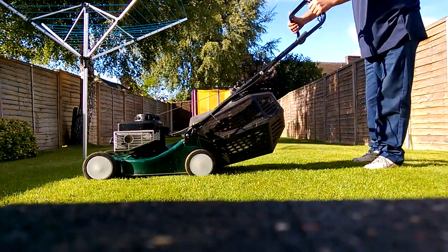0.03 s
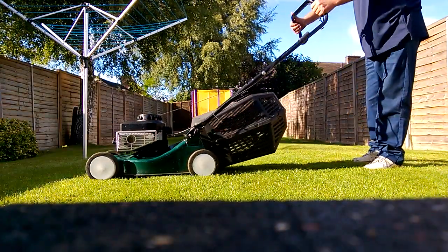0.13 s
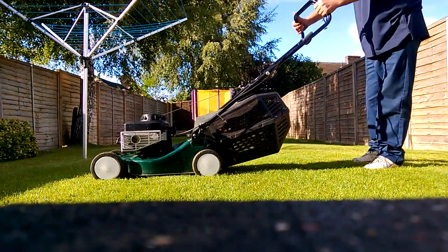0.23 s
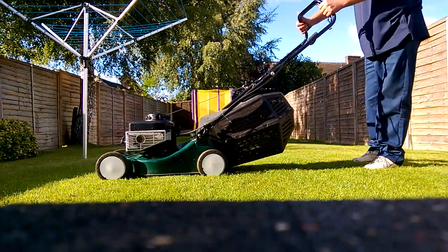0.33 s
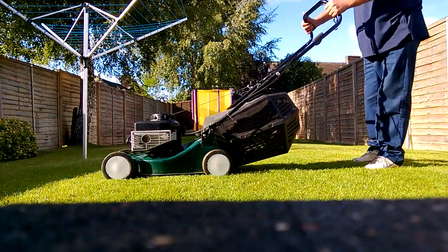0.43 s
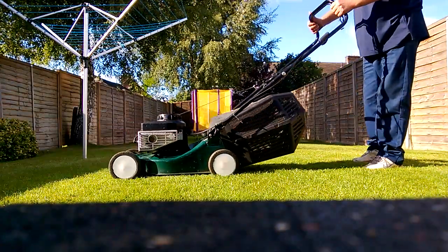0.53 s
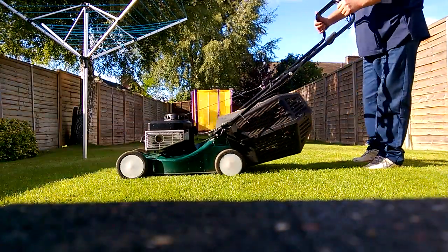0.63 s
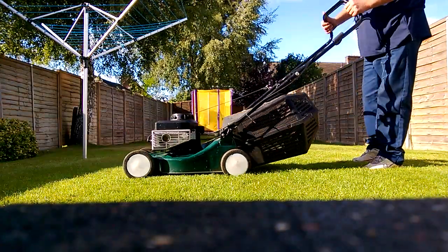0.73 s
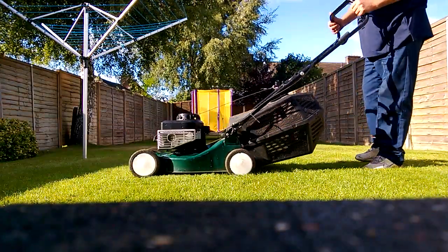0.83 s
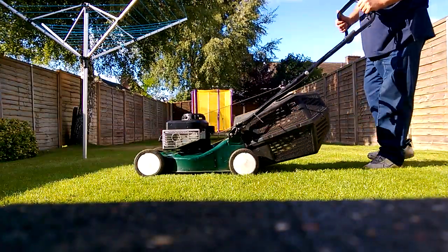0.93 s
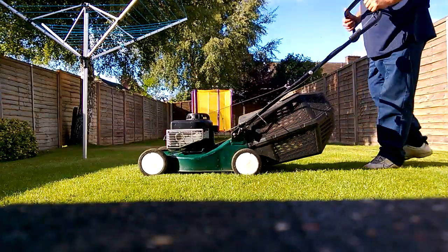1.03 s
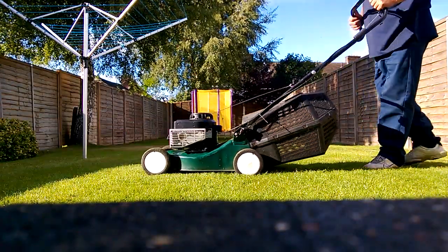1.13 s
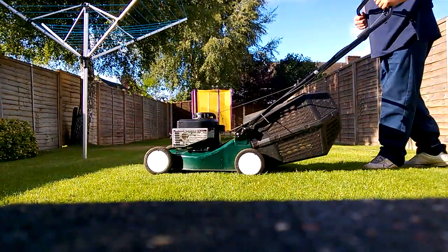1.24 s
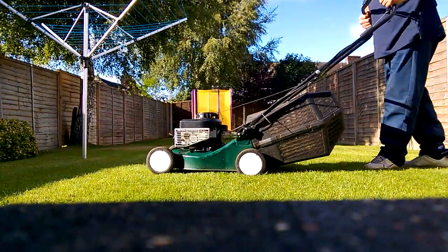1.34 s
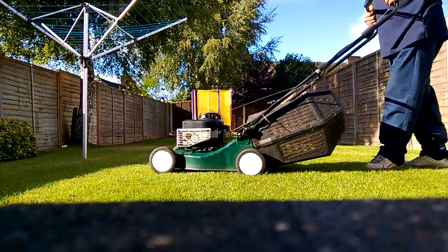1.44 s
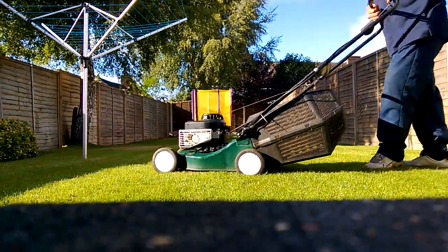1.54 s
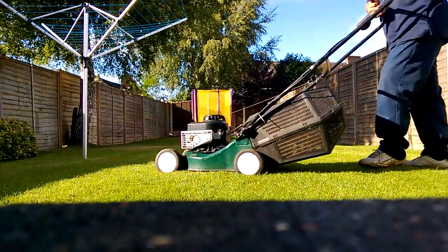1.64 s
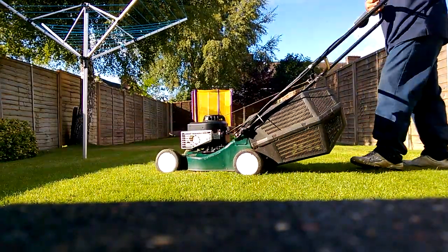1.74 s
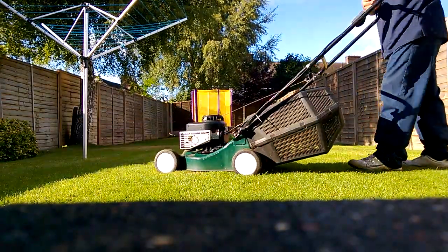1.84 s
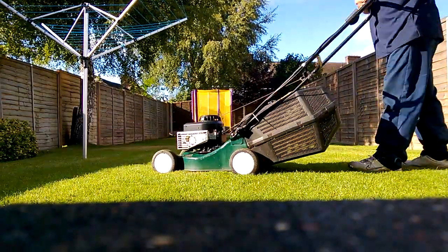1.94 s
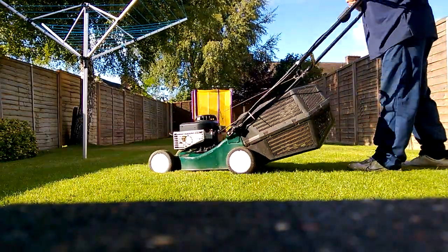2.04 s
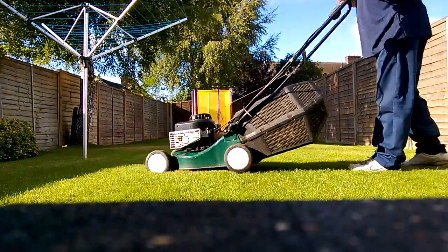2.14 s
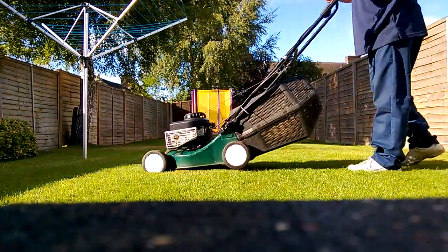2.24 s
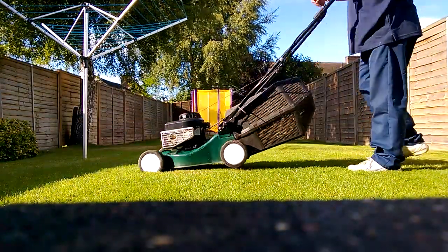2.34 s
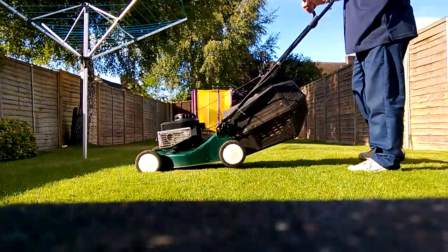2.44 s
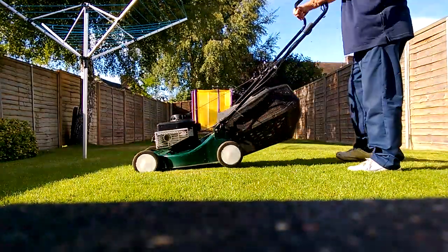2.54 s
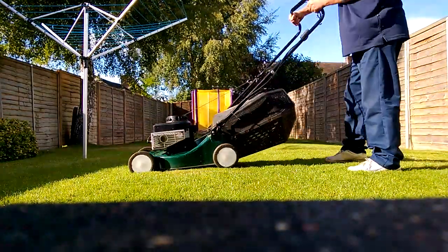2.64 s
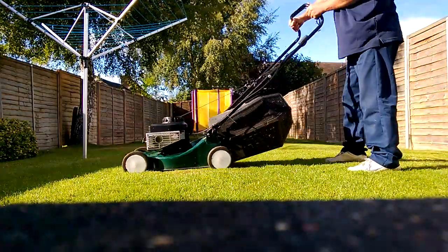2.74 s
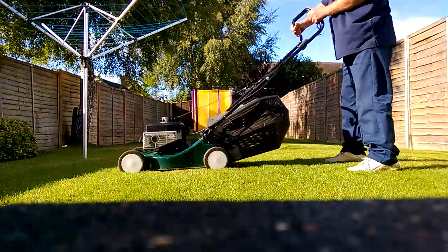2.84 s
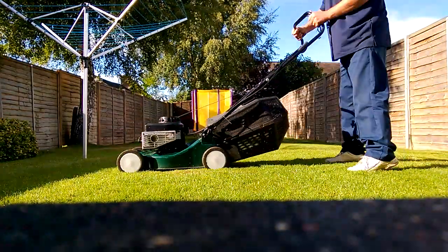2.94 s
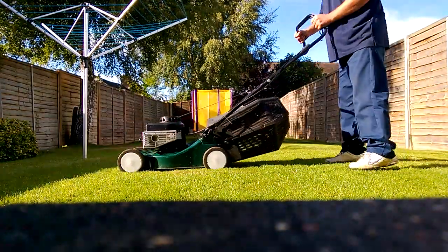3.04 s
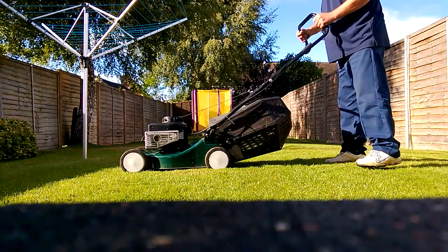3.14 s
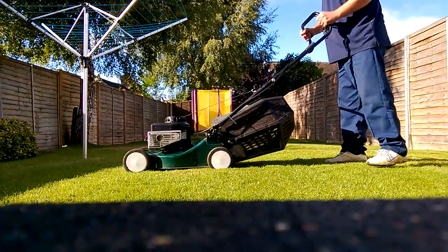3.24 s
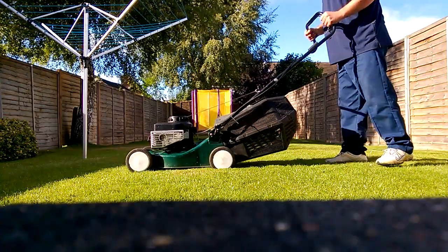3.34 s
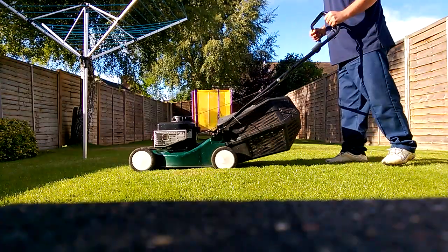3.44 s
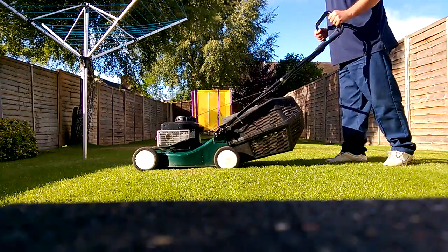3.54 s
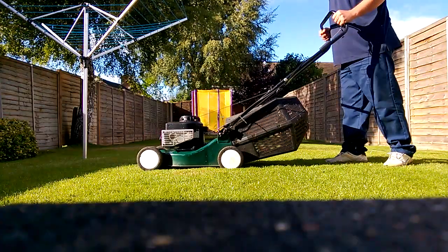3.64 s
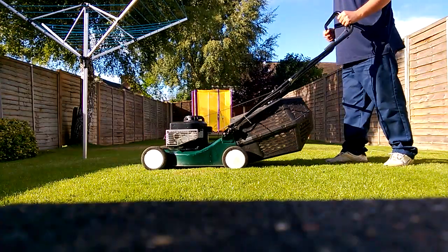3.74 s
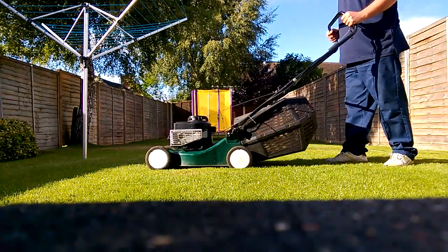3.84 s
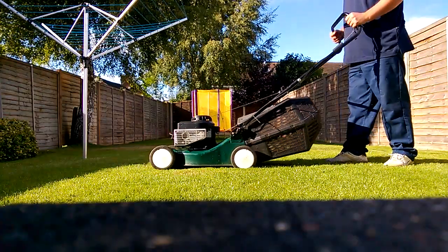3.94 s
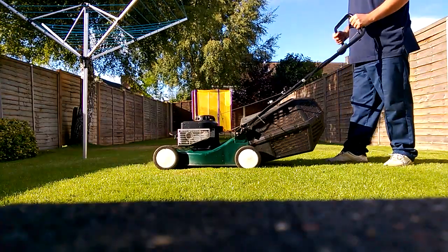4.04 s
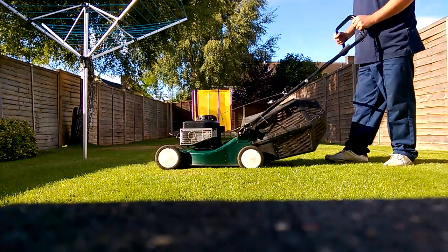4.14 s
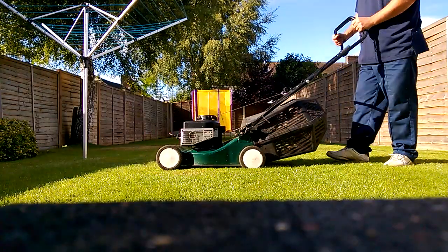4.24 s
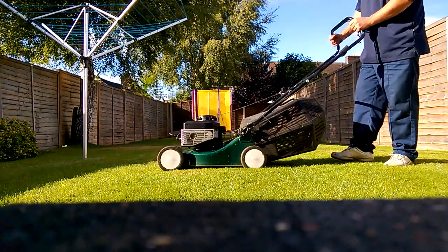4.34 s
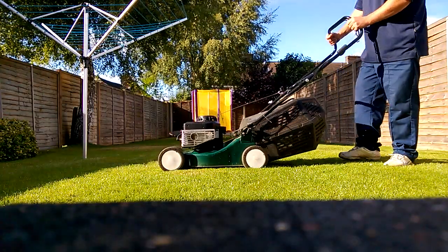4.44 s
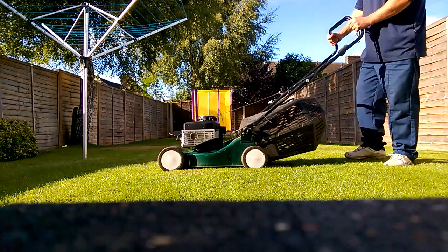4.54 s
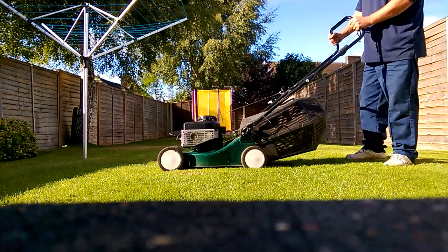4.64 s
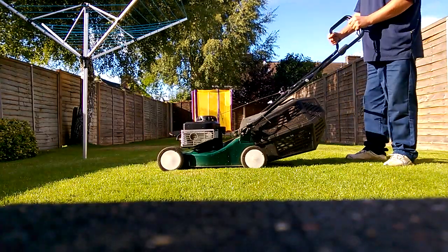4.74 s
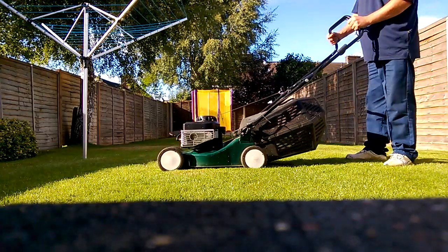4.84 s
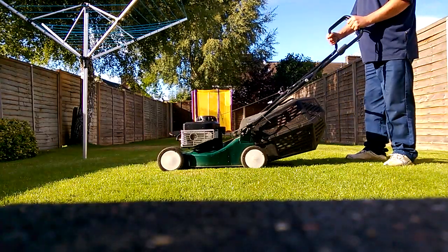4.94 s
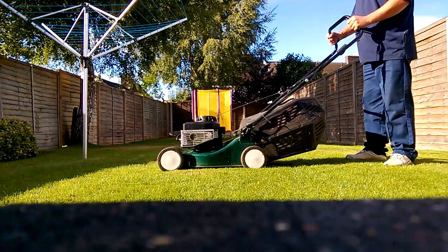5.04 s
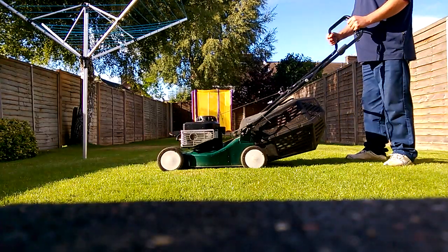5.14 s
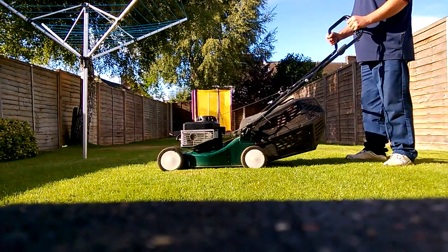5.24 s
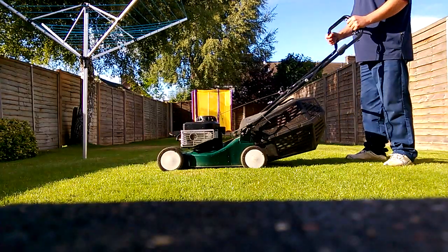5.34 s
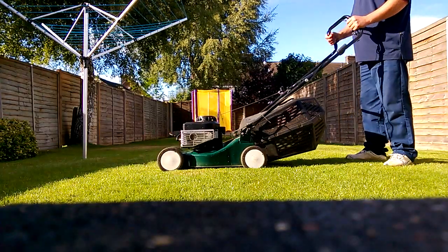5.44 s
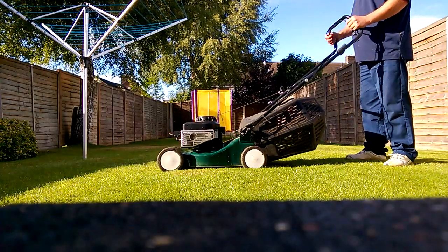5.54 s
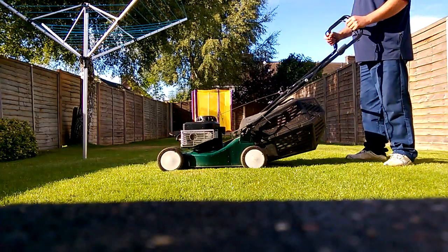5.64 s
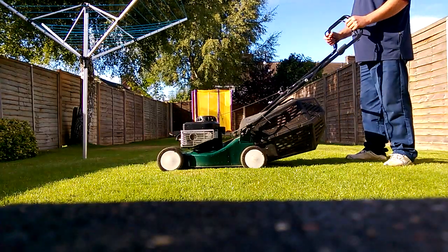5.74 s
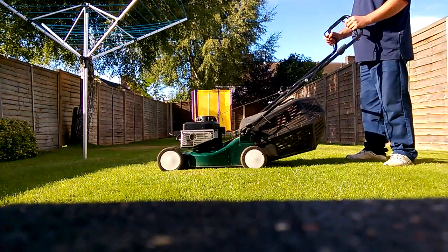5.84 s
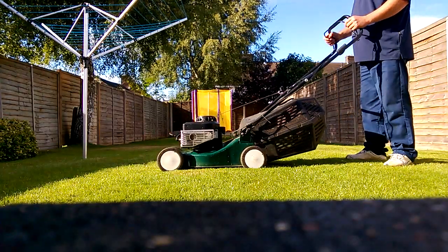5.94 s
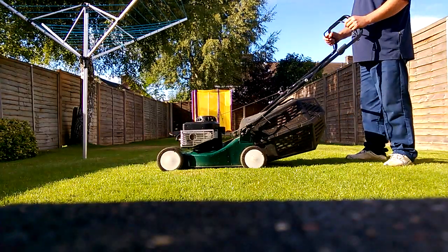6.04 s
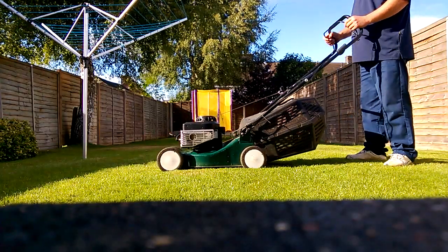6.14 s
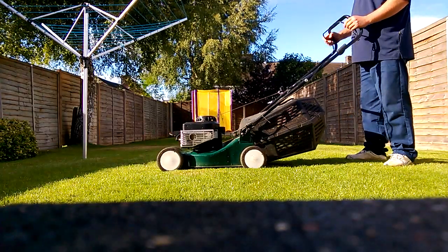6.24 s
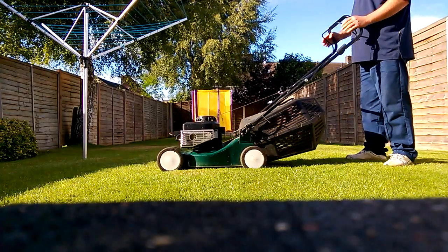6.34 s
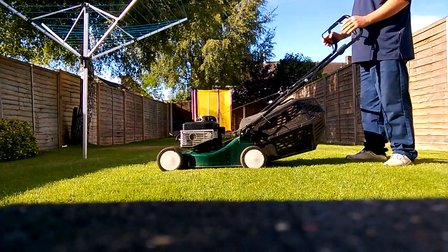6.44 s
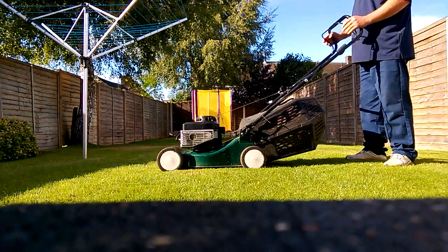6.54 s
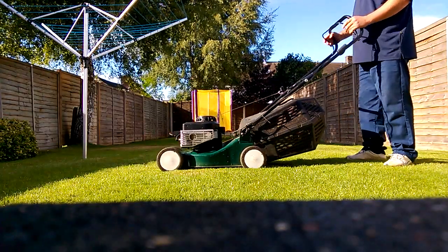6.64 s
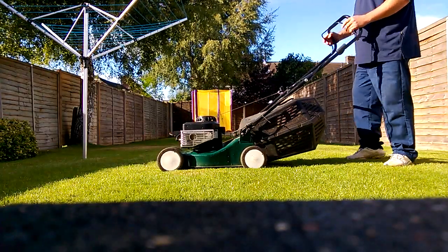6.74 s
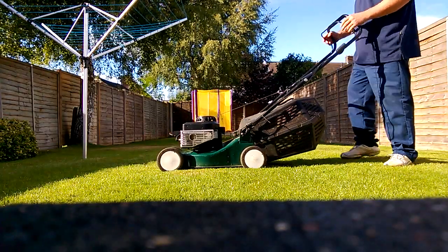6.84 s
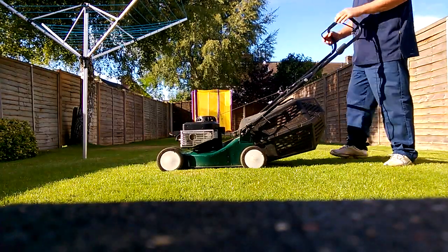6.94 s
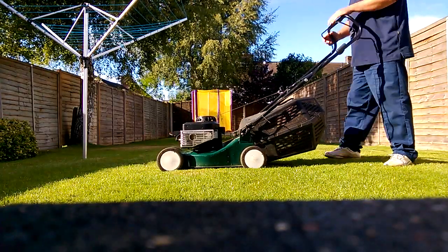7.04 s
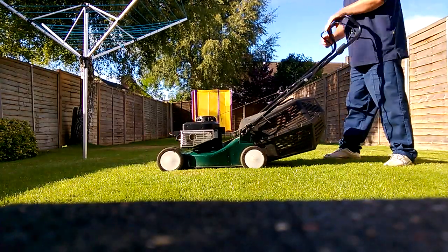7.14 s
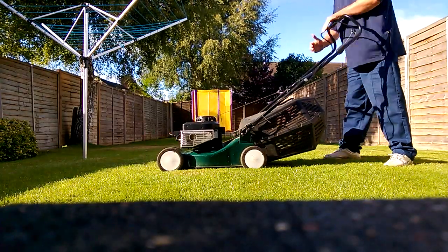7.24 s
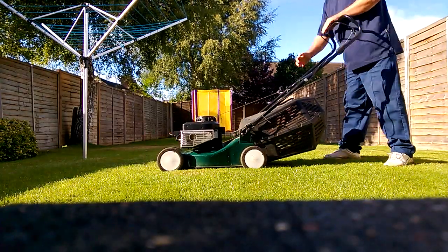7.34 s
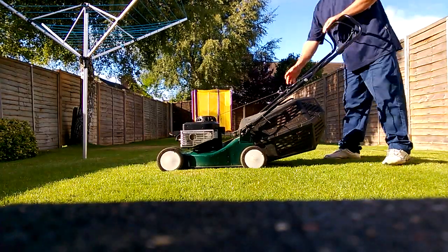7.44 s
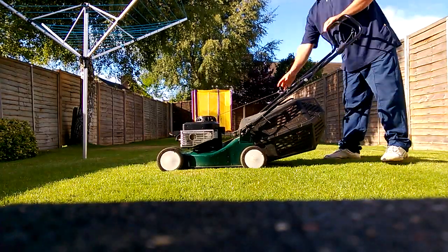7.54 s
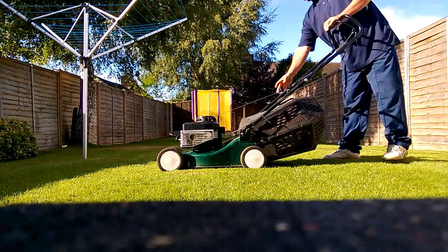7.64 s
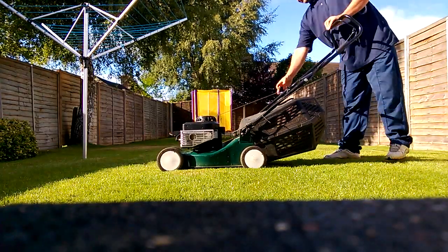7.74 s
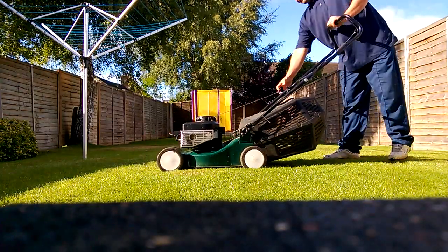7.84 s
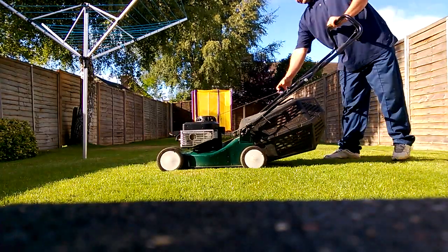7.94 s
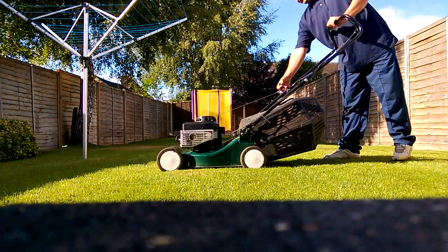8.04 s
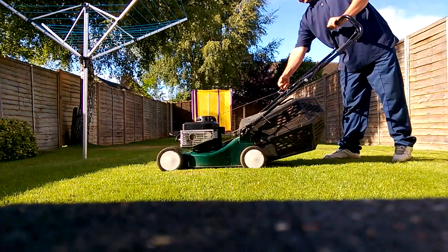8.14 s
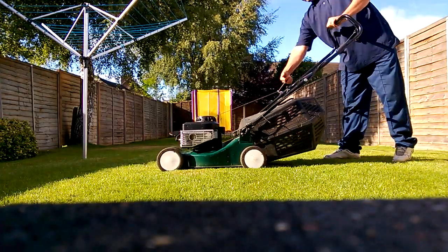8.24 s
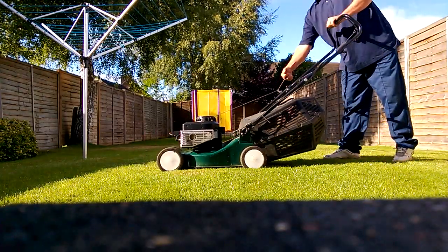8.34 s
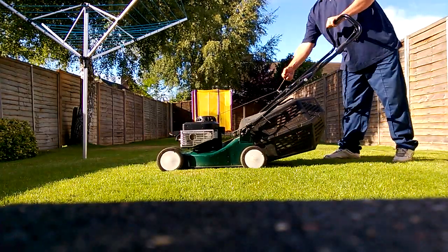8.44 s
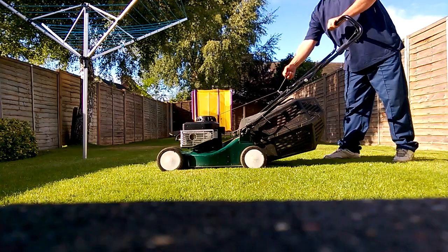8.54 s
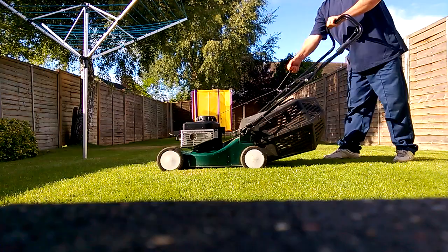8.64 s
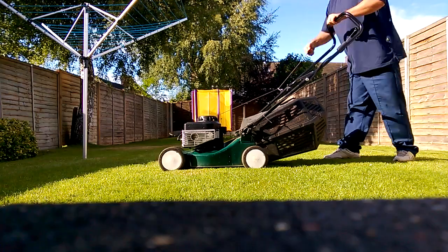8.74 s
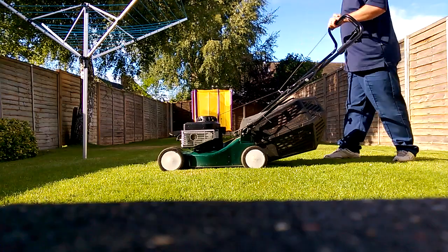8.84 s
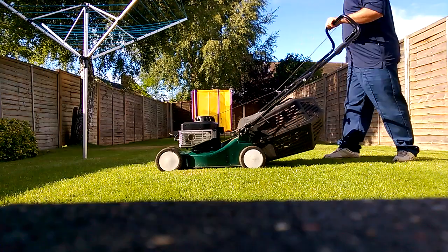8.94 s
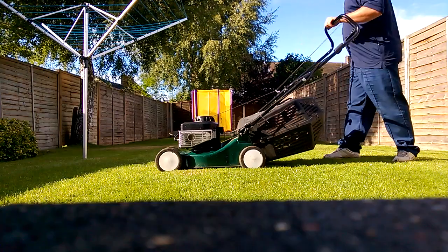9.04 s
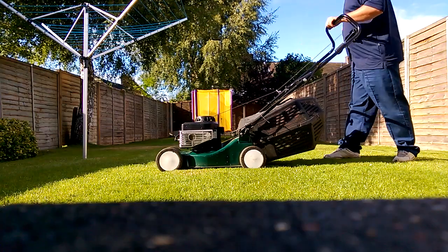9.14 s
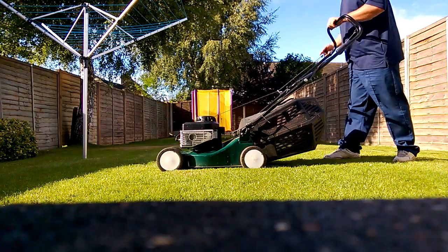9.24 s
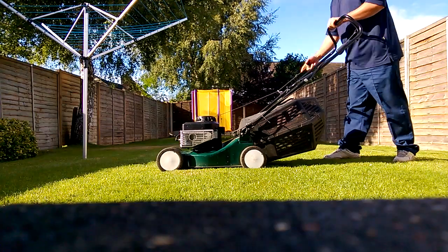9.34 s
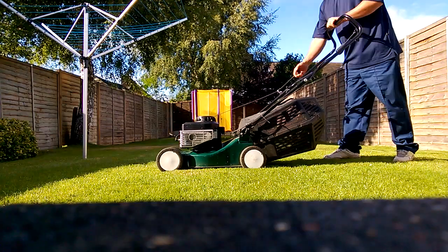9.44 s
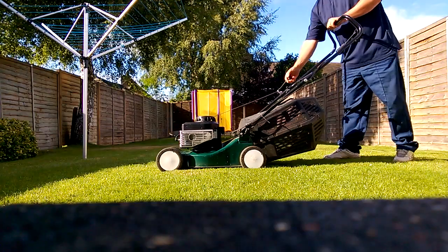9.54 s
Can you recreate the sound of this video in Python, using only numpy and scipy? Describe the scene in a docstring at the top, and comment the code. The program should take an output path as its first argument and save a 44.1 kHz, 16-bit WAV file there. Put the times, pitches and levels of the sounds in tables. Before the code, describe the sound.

A lawn mower engine runs in a garden, sputters to a stop, and after a short pause bangs back to life on a pull start.

```python
"""A petrol mower chugs about a fenced lawn, runs down to rest, then bangs back to life on one cord pull.
Each firing of its single-cylinder four-stroke thumps and spits from the exhaust, while the valve gear
clatters, the fan sings and the blade churns the air. With the spark cut it coasts down in soft chuffs.
The handle clicks, the starter reel whirrs, and the first charges bark and rattle the pawls.
The bright sounds slap back off wooden fences over a light breeze."""
import sys
import numpy as np
from scipy import signal
from scipy.fft import rfft, irfft, next_fast_len
from scipy.io import wavfile
from scipy.ndimage import uniform_filter1d

SR = 44100
rng = np.random.default_rng(int(sys.argv[2]) if len(sys.argv) > 2 else 0)


def generate_wav(signal):
    """Clip the signal to [-1, 1] and save it as 16-bit WAV at the path in sys.argv[1]."""
    frames = np.transpose(np.atleast_2d(signal))
    scaled = np.clip(frames, -1, 1) * 32767
    pcm = np.round(scaled).astype(np.int16)
    wavfile.write(sys.argv[1], SR, pcm)


N = 422919
TIME = np.arange(N) / SR
CUT_S, CATCH_S = 6.03, 8.92  # the spark is cut; the engine catches

# tone of the mower deck: (frequency [Hz], relative level [dB])
DECK_TONE = [(160, -23), (280, -5), (308, -7.5), (371, -7), (479, -2.5), (533, -3), (647, -4), (700, -7),
             (732, -6.5), (1480, -9), (2300, -23), (2990, -30), (5060, -120)]
# soft friction, for garden rustle and cord scrape: (frequency [Hz], relative level [dB])
RUSTLE_TONE = [(120, -2.5), (170, -6), (350, -6.5), (480, -6.5), (650, -7), (1050, -11), (1600, -20.5),
               (2200, -29), (5000, -41.5)]


def engine():
    """Every layer is locked to the crankshaft; returns the engine's body and its exhaust hiss."""
    # the governor hunts, then friction brakes the engine evenly: (time [s], rate [cycles/s])
    run = [(0, 22.8), (.41, 23.69), (.91, 23.29), (1.04, 23.52), (1.84, 22.9), (2.16, 24.14), (2.31, 23.08),
           (2.7, 22.66), (2.87, 23.76), (3.72, 23.22), (3.98, 24.13), (4.22, 22.61), (4.57, 24.02),
           (4.82, 22.54), (5.24, 23.86), (6.03, 23.42), (6.58, 6.4)]
    # the restart races up and settles: (time [s], rate [cycles/s])
    restart = [(8.7, 3.3), (8.85, 8.0), (8.96, 14.4), (9.05, 20.1), (9.15, 24.4), (9.3, 24.1), (9.45, 22.5),
               (9.59, 22.5)]
    # band faders as the mower moves about: (time [s], low bass [dB], bass [dB], middle [dB], treble [dB])
    faders = [(0.2, -33.5, -25.5, -28.5, -41.5), (0.7, -32, -26.5, -30, -42), (1.3, -32.5, -28, -29, -40.3),
              (1.8, -32, -29.5, -31.5, -39.5), (2.3, -30.5, -29, -31, -42.5), (2.95, -37, -28.5, -32, -45),
              (3.55, -34.5, -28, -30.5, -41), (4.5, -35.5, -30, -30, -45),
              (5.9, -35.5, -29.5, -28.5, -44.5)]
    low_db, bass_db, middle_db, treble_db = in_time(faders)
    rate, = in_time(list(run) + list(restart))
    run_cycle, running = crank(run)
    restart_cycle, restarted = crank(restart)
    first_run = TIME < restart[0][0]
    cycle = np.where(first_run, run_cycle, restart_cycle)
    turning = running + restarted * np.clip((TIME - 8.74) / .036, 0, 1)
    # with the spark cut, the puff is only squeezed air and comes later in the cycle
    unfired = np.clip((TIME - 6.02) / .08, 0, 1) * first_run
    valve = cycle - .17 * unfired + .011
    lazy = np.clip(1 - rate / 13, 0, 1)  # rises as the piston slows
    burn_db = uneven_burn(cycle, limp_db=6, limp_from_s=9.13)
    thump_db = low_db + effort(rate, speed_power=3, unfired_db=9.5, catch_db=14, settle_s=.58)
    body = exhaust_thump(valve, thump_db + .5 * burn_db)
    body += blade_hum(cycle, thump_db)
    body += exhaust_drone(valve, rate, bass_db + .12 * burn_db)
    body += fan(cycle, rate, middle_db, catching=~first_run)
    body += deck(cycle, valve, rate, lazy, middle_db)
    body += unfired * hollow_boom(cycle, rate, hollow_hz=243, width_hz=21.5)
    hiss = exhaust_hiss(valve, rate, lazy, unfired, burn_db, middle_db, treble_db)
    return turning * body, turning * hiss


def crank(speed):
    """Cycles turned by the shaft, and a gate that is open while it turns."""
    s, rate = np.transpose(speed)
    turned = np.cumsum(np.interp(TIME, s, rate, left=0, right=0)) / SR - .62
    return turned, np.clip(np.minimum(TIME - s[0], s[-1] - TIME) / .042 + 1, 0, 1)


def effort(rate, speed_power, unfired_db, catch_db, settle_s):
    """Gain in dB: grows with speed, shifts with the spark cut, surges until the governor throttles back."""
    governed_rate = 23.4  # cycles/s
    unfired = np.clip((TIME - CUT_S) / .04, 0, 1) * (TIME < CATCH_S)
    surge = (TIME >= CATCH_S) * hump(CATCH_S, settle_s)
    return speed_power * 20 * np.log10(rate / governed_rate) + unfired_db * unfired + catch_db * surge


def uneven_burn(cycle, limp_db, limp_from_s):
    """No two charges burn alike, and after the restart strong and weak ones take turns; in dB."""
    firing = np.floor(cycle + 1 / 4).astype(int)
    limp = limp_db * (TIME > limp_from_s) * (-1.) ** firing
    return uniform_filter1d(limp + rng.standard_normal(256)[firing], 128)


def exhaust_thump(valve, level_db):
    """Each firing pushes then pulls the air, the higher orders lagging in the silencer."""
    # low end of the pulse: (order [x firing rate], relative level [dB])
    partials = [(1, -23), (2, 0), (3, -2.5)]
    return from_db(level_db - 4) * orders(valve, partials, lag=.025, waver_db=2)


def exhaust_drone(valve, rate, level_db):
    """Overtones of the firings merge into a wavering drone."""
    # upper bass of the pulse: (order [x firing rate], relative level [dB])
    partials = [(5, 0), (6, 5.5), (7, -4), (8, -1), (9, -3.5)]
    drone_db = level_db - .5 + effort(rate, speed_power=2.1, unfired_db=-.5, catch_db=4.5, settle_s=.36)
    return from_db(drone_db) * orders(valve, partials, lag=.0078, waver_db=1.9)


def exhaust_hiss(valve, rate, lazy, unfired, burn_db, middle_db, treble_db):
    """Gas leaves the valve in a sharp, gritty spit and a longer rasp."""
    # tone of each: (frequency [Hz], relative level [dB])
    spit_tone = [(1200, -14), (2500, -3.5), (4000, 1), (5500, -6), (7700, 0.5), (10400, 0.5), (12800, -6),
                 (16000, -4)]
    rasp_tone = [(1500, 0), (2000, -0.5), (2650, 0), (3600, -2.5), (5400, -10), (7200, -9.5), (7750, -8),
                 (8400, -10), (10400, -11), (12800, -14.5), (16000, -19)]
    spit_db = treble_db - 1.11 + effort(rate, speed_power=1.18, unfired_db=1, catch_db=14, settle_s=.26)
    rasp_db = .5 * (middle_db + treble_db) - 2.3
    rasp_db += effort(rate, speed_power=1, unfired_db=.8, catch_db=9, settle_s=.36)
    spit_puffs = (1 - unfired) * puffs(valve - .03, width=.032, tail_db=-13, tail_cycles=.4, leak_db=-34.5)
    rasp_puffs = (1 - unfired) * puffs(valve - .03, width=.037, tail_db=0, tail_cycles=.49, leak_db=-7)
    # unburnt air leaves in one long soft swell
    swell = 1.83 * unfired * from_db((7.5 + 17 * lazy) * (np.cos(2 * np.pi * (valve - .1)) - 1))
    grit = from_db(2 * drift(400))
    spit = from_db(spit_db - 38 * lazy + .98 * burn_db) * grit * noise(spit_tone) * (swell + spit_puffs)
    rasp = from_db(rasp_db + 2.5 * lazy) * noise(rasp_tone) * (swell + rasp_puffs)
    # a slow piston pushes the gas out softly, so the puff turns dull
    return dulled(spit + rasp, 3 * lazy, edge_hz=10500)


def puffs(cycle, width, tail_db, tail_cycles, leak_db):
    """Gas flow bursts as the valve opens, then trails off over a steady leak; rms 1 while mowing."""
    since = (cycle + 1 / 8) % 1 - 1 / 8
    tail = from_db(tail_db) * (since > 0) * np.exp(-np.abs(since) / tail_cycles)
    flow = np.exp(-(since / width) ** 2) + tail + from_db(leak_db)
    return flow / np.sqrt(np.mean(flow[:6 * SR] ** 2))


def deck(cycle, valve, rate, lazy, level_db):
    """Clatter and swish from the deck; at low speed each compression stroke stands out as a chuff."""
    deck_db = level_db + .15 + effort(rate, speed_power=1.18, unfired_db=-.56, catch_db=2, settle_s=.5)
    chuff_db = 3.8 * np.sqrt(lazy) * (np.cos(2 * np.pi * (valve - .15)) - .55)
    churn = .5 * clatter(cycle, t60=.06, scatter_db=3) + blade_swish(cycle, swish_db=1.5)
    return from_db(deck_db + chuff_db) * churn


def clatter(cycle, t60, scatter_db):
    """Every contact sets the deck ringing in its own way, once a cycle."""
    # valve and piston contacts: (position [cycles], relative level [dB])
    contacts = [(.955, 4), (.27, 10), (.46, 6), (1, -11)]
    out = np.zeros(N)
    for place, db in contacts:
        taps = np.diff(np.floor(cycle - place), prepend=np.floor(cycle[0] - place))
        out += signal.oaconvolve(taps * from_db(db + scatter_db * drift(25)), dense_ring(t60))[:N]
    return colour(out, DECK_TONE)


def blade_swish(cycle, swish_db):
    """Turbulence swells each time a blade tip passes the chute, four times a cycle."""
    return rms_one(noise(DECK_TONE) * from_db(swish_db * np.cos(8 * np.pi * cycle)))


def blade_hum(cycle, level_db):
    """A low hum: two tips pass on each of the two turns of a cycle."""
    return from_db(np.minimum(level_db, -28) - .5 + .39 * drift(1.2)) * np.cos(8 * np.pi * cycle)


def hollow_boom(cycle, rate, hollow_hz, width_hz):
    """The hollow under the deck booms as the slowing blade's third harmonic sweeps through it."""
    order = 12
    resonance = np.exp(-((order * rate - hollow_hz) / width_hz) ** 2)
    return from_db(-25.5) * resonance * np.sin(2 * np.pi * order * cycle)


def fan(cycle, rate, level_db, catching):
    """Fan tones swell and fade over a rumble as the mower moves; they are weaker on the restart."""
    # fan tones: (order [x firing rate], relative level [dB])
    partials = [(10, 0), (12, -1), (14, -9), (15, -16), (16, -17.5), (18, -6.5), (20, -8.5), (21, -10.5),
                (23, -11), (25, -19), (27, -10), (28, -13.5), (32, -12.5), (36, -8.5)]
    # low rumble: (frequency [Hz], relative level [dB])
    rumble_tone = [(25, -13), (50, -8.5), (130, -10.5), (260, -10), (400, -17), (700, -43)]
    fan_db = level_db - 2.5 + effort(rate, speed_power=2, unfired_db=1, catch_db=10, settle_s=.3)
    flutter = from_db(fan_db - 3.5 * catching + 2 * drift(37))
    tones = flutter * orders(cycle, partials, lag=.02099, waver_db=3.5)
    return tones + from_db(fan_db - 5.5) * noise(rumble_tone)


def bangs():
    """The first charges thump, bark in the silencer and rattle the pawls against the starter cup."""
    # hard firings: (time [s], thump [dB], bark [dB], relative rattle level [dB])
    firings = [(8.834, -20, -36, -46), (8.927, -13.5, -22, -22), (8.993, -12.5, -11, -16.5),
               (9.050, -14, -18, -40), (9.096, -16, -15, -40), (9.139, -18, -20, -42),
               (9.181, -16, -25, -40), (9.264, -20, -17, -44), (9.347, -22, -28.5, -46)]
    # steel starter cup: (frequency [Hz], relative level [dB], t60 [s])
    cup_modes = [(2680, 3, 0.026), (2920, 2, 0.02), (6530, -1, 0.036), (7740, 0, 0.048), (8160, -6, 0.048),
                 (10080, 2, 0.018)]
    thump_hz, bark_hz, ticks_per_s = 90, 477, 1200
    out, t = np.zeros(N), TIME[:SR // 2]
    tick = signal.sosfilt(signal.butter(1, 2500, "high", fs=SR, output="sos"), dense_ring(.008))
    ring = modes(cup_modes)
    strike = ring + from_db(2) * np.linalg.norm(ring) * tick
    for s, thump_db, bark_db, rattle_db in firings:
        add(out, s, -from_db(thump_db) * np.sin(2 * np.pi * thump_hz * t) * dying(.081))
        add(out, s - .006, from_db(bark_db) * np.sin(2 * np.pi * bark_hz * t) * dying(.052))
        pawls = (rng.random(len(t)) < ticks_per_s / SR) * rng.standard_normal(len(t)) * dying(.32)
        add(out, s, from_db(rattle_db - 4) * signal.fftconvolve(pawls / np.linalg.norm(pawls), strike))
    return out


def starter_cord(pull_s, low_hz, high_hz, roughness):
    """The reel's rough whirr rises and thins with the pull, the cord scraping as it runs."""
    spin_up = .5 + .5 * np.tanh((TIME - pull_s - .047) / .016)
    hz = low_hz + (high_hz - low_hz) * spin_up
    phase = 2 * np.pi * np.cumsum(hz * (1 + roughness * drift(87))) / SR
    flutter = drift(110) * np.cos(phase) + drift(110) * np.sin(phase)
    whirr = gate(pull_s, pull_s + .138, attack_s=.011, release_s=.036) * (.9 * np.sin(phase) + .6 * flutter)
    scrape = gate(pull_s - .024, CATCH_S + .036, attack_s=.088, release_s=.036) * noise(RUSTLE_TONE)
    return from_db(-30 - 5.5 * spin_up) * whirr + from_db(-38) * scrape


def clicks(t60):
    """Handle and starter knock with a dull body, a bright edge and a metal ping."""
    # knocks: (time [s], level [dB], treble offset [dB], ping [dB])
    hits = [(6.625, -37.5, -20, -90), (6.673, -42, -27, -90), (6.833, -55, -28, -89),
            (7.872, -37.5, -2.5, -47), (7.890, -39.5, -1.5, -69), (8.29, -50, 0.5, -78),
            (8.329, -41, -2.5, -66), (8.348, -52, -3, -70), (8.785, -35, 4, -62), (8.824, -23.5, -2.5, -59)]
    # tone of body and edge: (frequency [Hz], relative level [dB])
    body_tone = [(150, -8), (350, -8), (520, 5), (800, -10), (1500, -7), (2500, -31), (5000, -50)]
    edge_tone = [(700, -12), (1500, 2.5), (2700, 8.5), (4000, -1.5), (5500, -5), (9000, -6.5),
                 (16000, -26.5)]
    # tubular handle: (frequency [Hz], relative level [dB], t60 [s])
    handle_modes = [(1150, 0, .1), (2410, 1, .05), (2750, -1, .03), (4850, -10, .14), (5330, 8, .035),
                    (7880, -5, .04), (10300, -11, .05)]
    body, edge, ping = np.zeros((3, N))
    for s, db, treble_db, ping_db in hits:
        add(body, s, from_db(db - 3.5) * dying(t60))
        add(edge, s, from_db(db - 6.5 + treble_db) * dying(t60))
        add(ping, s, from_db(ping_db) * modes(handle_modes))
    knock = signal.sosfilt(signal.butter(2, 1500, fs=SR, output="sos"), body * noise(body_tone))
    return knock + edge * noise(edge_tone) + ping


def thuds():
    """Dull bumps as the mower rocks to rest and the slack of the cord is taken up."""
    # bumps: (time [s], frequency [Hz], level [dB])
    bumps = [(6.70, 80, -43), (6.91, 55, -49), (7.06, 60, -52), (8.298, 47, -36), (8.627, 68, -37)]
    return sum(from_db(db) * hump(s, .019) * np.sin(2 * np.pi * hz * (TIME - s)) for s, hz, db in bumps)


def fences(x, tail_db, t60):
    """A few slaps off the fences and a short diffuse tail."""
    # echoes: (delay [s], level [dB])
    slaps = [(.0062, -26.5), (0.013, -13.5), (0.015, -16), (.018, -18.5), (.0255, -24.5)]
    response = from_db(tail_db) * dense_ring(t60)
    for delay, db in slaps:
        response[int(delay * SR)] += from_db(db)
    return x + signal.oaconvolve(x, response)[:N]


def garden():
    """A bed of low gusting breeze, soft rustling and far hiss."""
    # tone of breeze and hiss: (frequency [Hz], relative level [dB])
    breeze_tone = [(12, -43), (20, -4), (49, -2.5), (67, -1), (81, -6), (200, -17), (260, -41), (440, -120)]
    hiss_tone = [(1000, 2), (5000, -3), (8000, -9.5), (16000, -16.5)]
    # brief louder rustles: (time [s], half length [s], level [dB])
    flurries = [(6.69, 0.055, -53), (7.34, .06, -63), (7.559, 0.042, -60), (8.07, .06, -65),
                (8.39, 0.072, -56)]
    breeze = from_db(-58 + 2 * drift(4))
    rustle = from_db(-63 + 2 * drift(2)) + sum(from_db(db) * hump(s, half) for s, half, db in flurries)
    return breeze * noise(breeze_tone) + rustle * noise(RUSTLE_TONE) + from_db(-79) * noise(hiss_tone)


def orders(cycle, partials, lag, waver_db):
    """Wavering harmonics of the firing rate, the higher ones lagging in phase; rms near 1."""
    total = np.sqrt(sum(from_db(db) ** 2 for k, db in partials) / 2)
    return sum(-from_db(db + waver_db * drift(.78)) * np.sin(2 * np.pi * round(k) * cycle - lag * k * k)
               for k, db in partials) / total


def modes(table):
    """Impulse response of a few ringing modes."""
    return sum(from_db(db) * np.sin(2 * np.pi * hz * TIME[:SR // 2]) * dying(t60) for hz, db, t60 in table)


def dense_ring(t60):
    """Impulse response of countless close modes, unit energy."""
    response = rng.standard_normal(SR // 2) * dying(t60)
    return response / np.linalg.norm(response)


def noise(spectrum):
    """Coloured noise, rms 1."""
    return colour(rng.standard_normal(N), spectrum)


def colour(x, spectrum):
    """A smooth EQ curve that falls 45 dB an octave past its ends; rms 1."""
    size = next_fast_len(N)
    octave = np.log2(np.maximum(np.fft.rfftfreq(size, 1 / SR), 1))
    hz, db = np.transpose(spectrum)
    beyond = np.abs(octave - np.clip(octave, np.log2(hz[0]), np.log2(hz[-1])))
    gain = from_db(np.interp(octave, np.log2(hz), db) - 45 * beyond)
    return rms_one(irfft(rfft(x, size) * gain, size)[:N])


def dulled(x, share, edge_hz):
    """Crossfade to a low-passed copy."""
    share = np.clip(share, 0, 1)
    return (1 - share) * x + share * signal.sosfiltfilt(signal.butter(2, edge_hz, fs=SR, output="sos"), x)


def drift(hz):
    """Smooth random modulation up to about this frequency, rms 1."""
    hop = 40
    pole = np.exp(-2 * np.pi * hz * hop / SR)
    slow = signal.lfilter([1], [1, -2 * pole, pole * pole], rng.standard_normal(N // hop + 2002))[2000:]
    return np.interp(np.arange(N) / hop, np.arange(len(slow)), rms_one(slow))


def dying(t60):
    """Half a second of exponential decay."""
    return np.exp(-np.log(1000) * TIME[:SR // 2] / t60)


def gate(start, end, attack_s, release_s):
    """Rise, hold and fall between two times."""
    return np.clip(np.minimum((TIME - start) / attack_s, (end - TIME) / release_s), 0, 1)


def hump(s, half_length):
    """A smooth swell of height 1 around a time."""
    return np.exp(-((TIME - s) / half_length) ** 2)


def in_time(rows):
    """Each column of a curve, sample by sample."""
    s, *columns = np.transpose(rows)
    return [np.interp(TIME, s, c) for c in columns]


def add(out, s, sound):
    """Mix a sound in at a time."""
    start = int(s * SR)
    out[start:start + len(sound)] += sound[:N - start]


def from_db(db):
    """Decibels to gain."""
    return 10 ** (np.asarray(db) / 20)


def rms_one(x):
    """Scale to unit rms."""
    return x / np.sqrt(np.mean(x ** 2) + 1e-20)


def scene():
    """The mower in the garden, its bright sounds echoing off the fences."""
    body, hiss = engine()
    handling = clicks(t60=.12) + starter_cord(pull_s=8.716, low_hz=550, high_hz=1043, roughness=.08)
    bright = fences(hiss + handling, tail_db=-14, t60=.21)
    return (body + bangs() + thuds() + bright + garden())[None]


def record(dry):
    """A steep high cut at 15.9 kHz."""
    return signal.sosfilt(signal.ellip(12, .1, 80, 15900, fs=SR, output="sos"), dry)


dry = scene()
out = record(dry)
generate_wav(out)
```